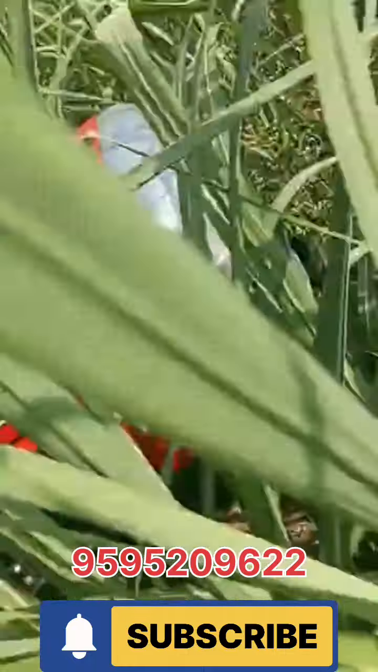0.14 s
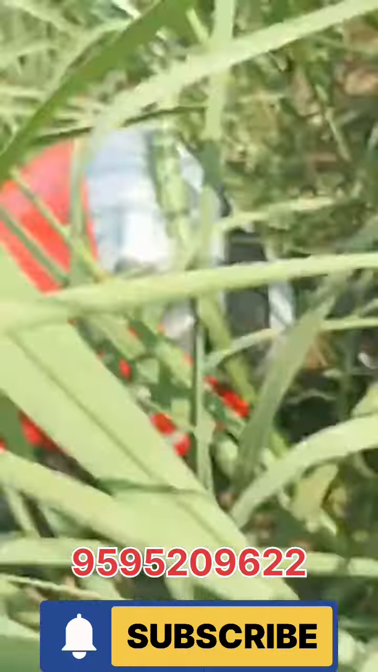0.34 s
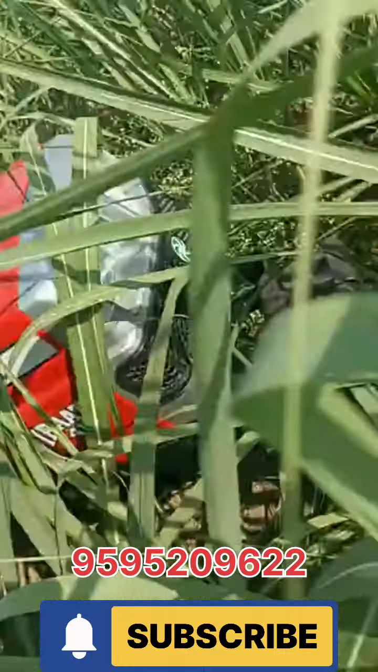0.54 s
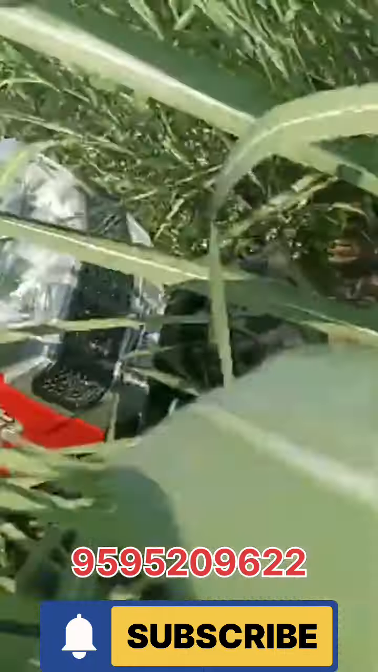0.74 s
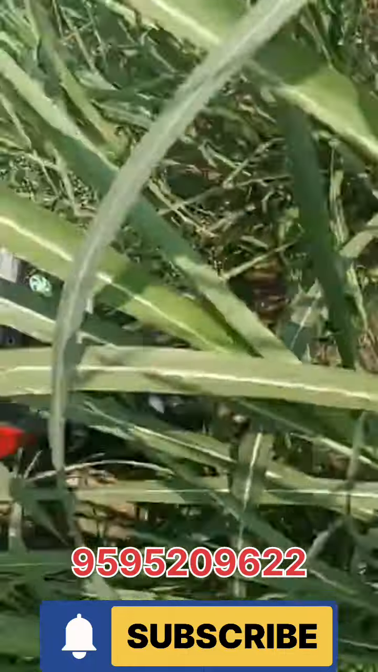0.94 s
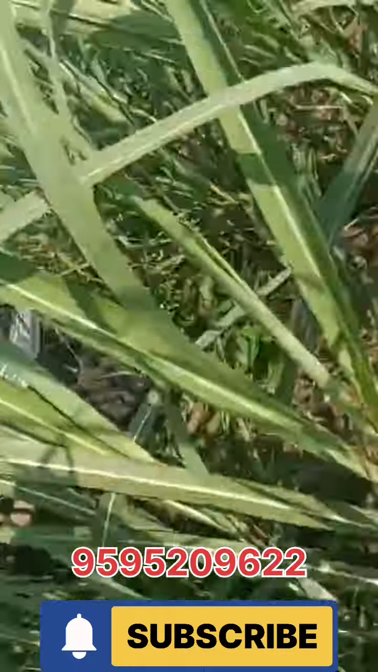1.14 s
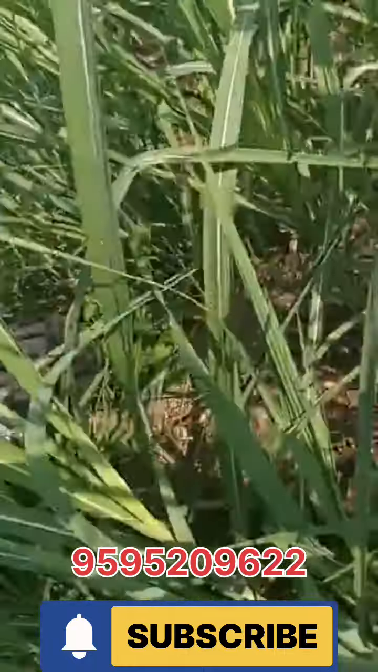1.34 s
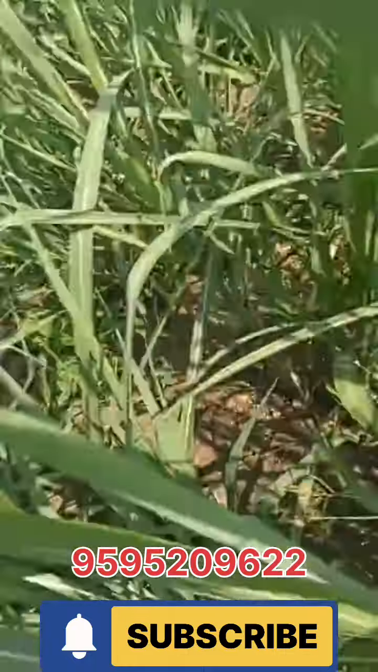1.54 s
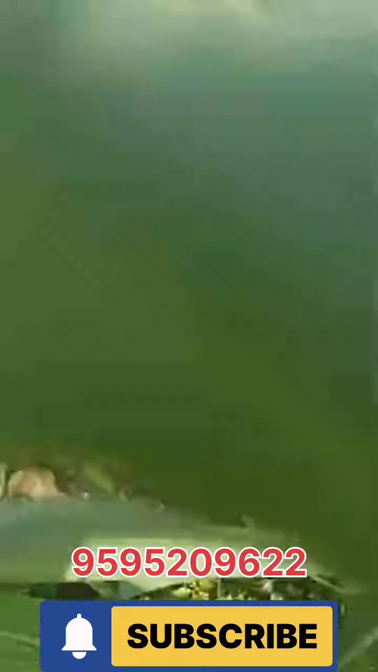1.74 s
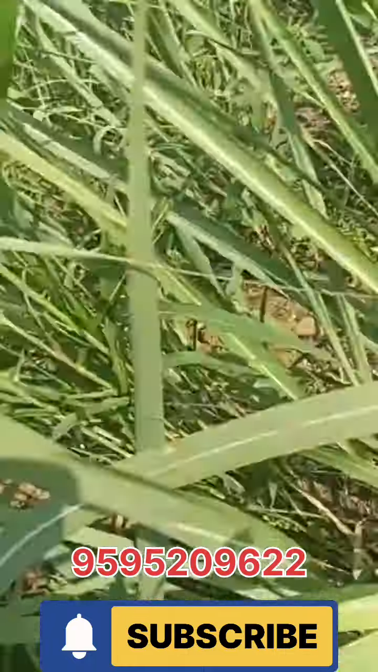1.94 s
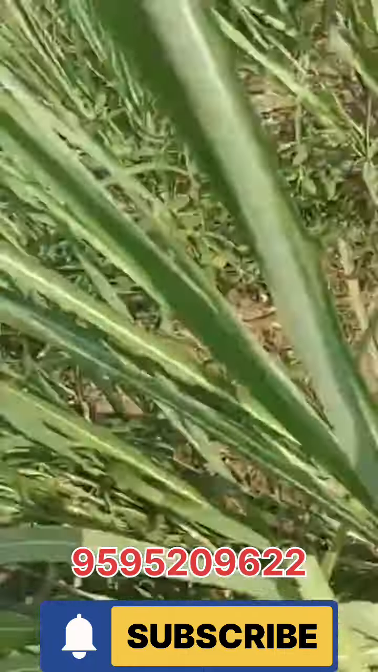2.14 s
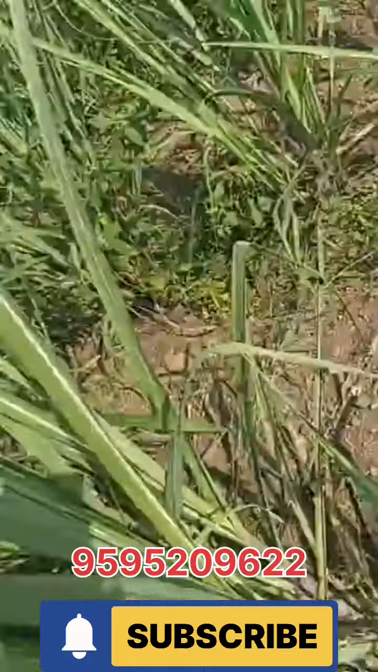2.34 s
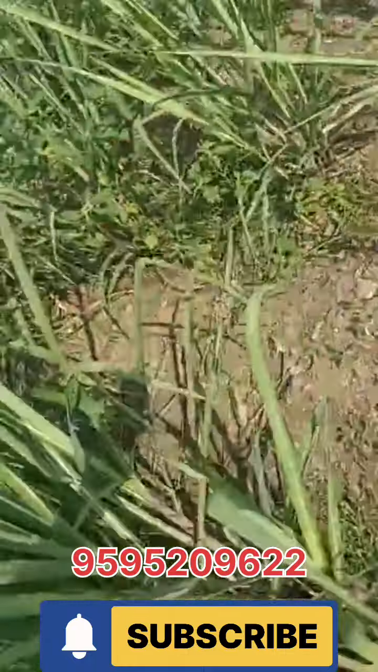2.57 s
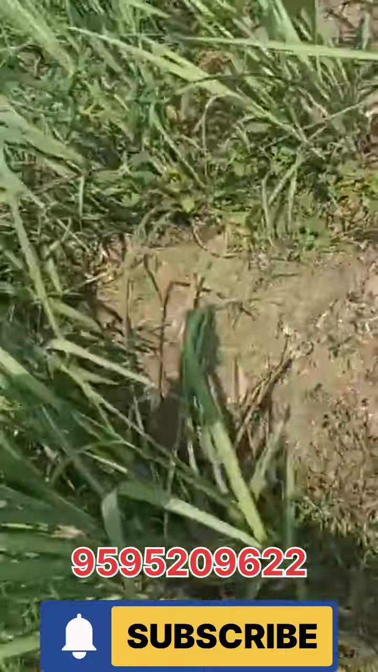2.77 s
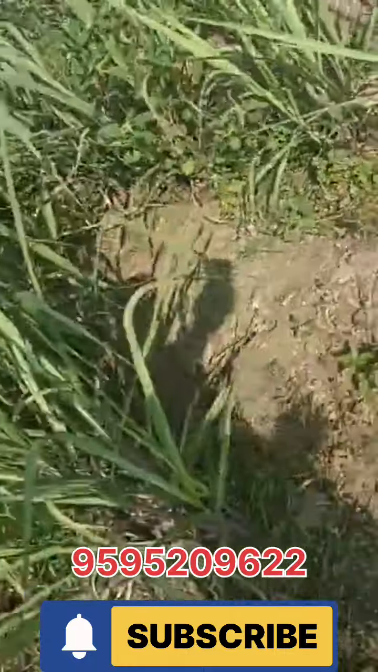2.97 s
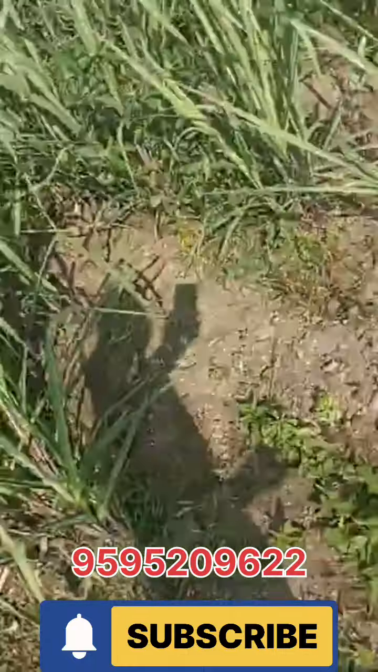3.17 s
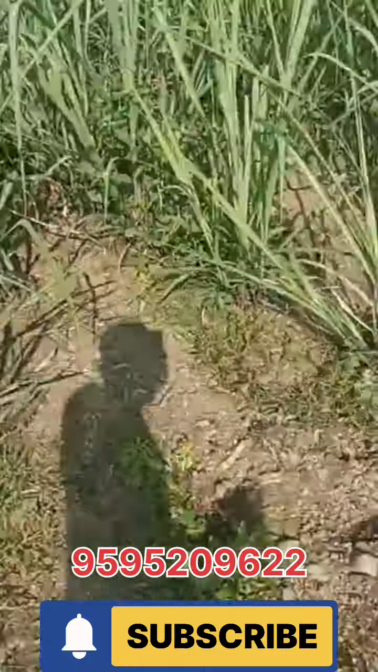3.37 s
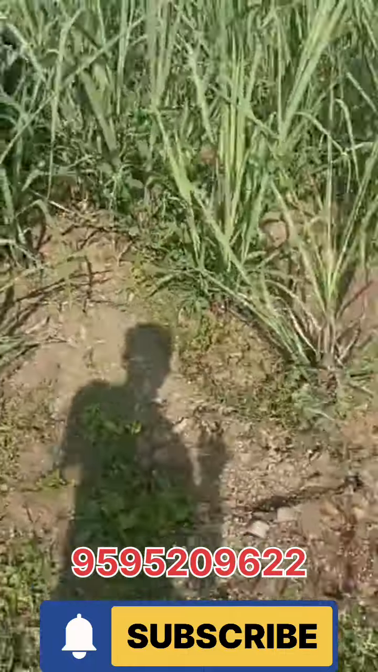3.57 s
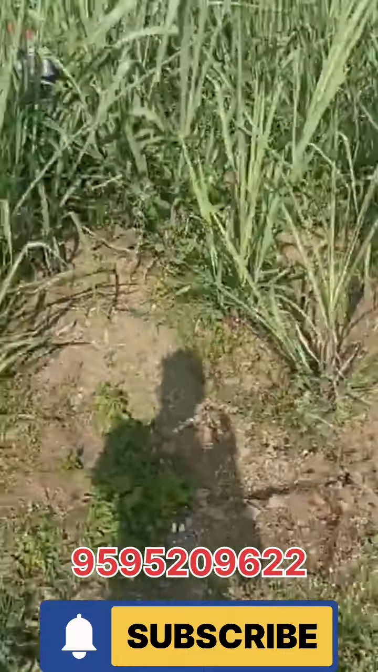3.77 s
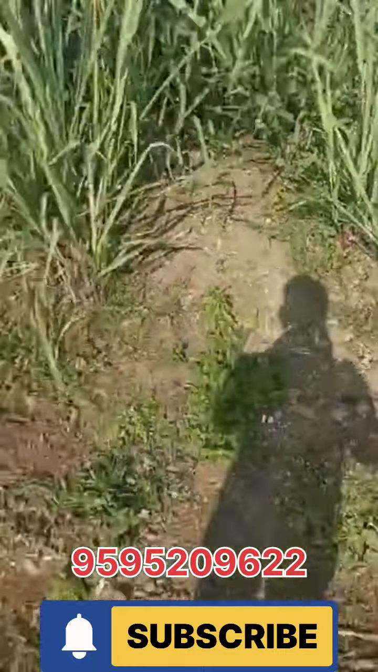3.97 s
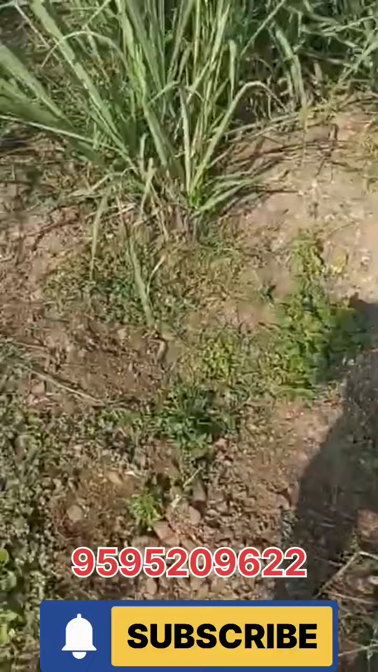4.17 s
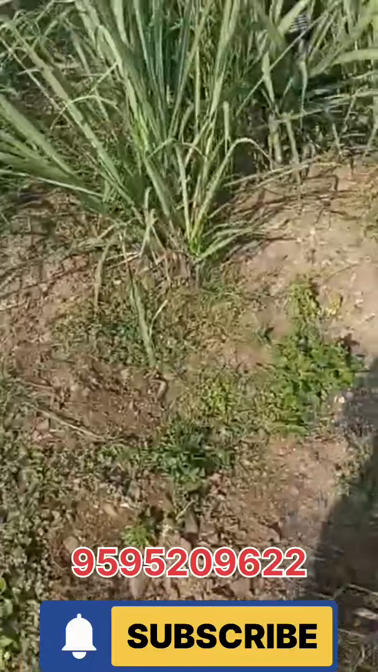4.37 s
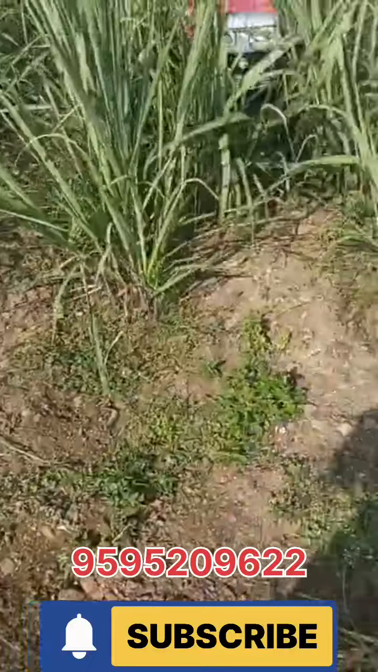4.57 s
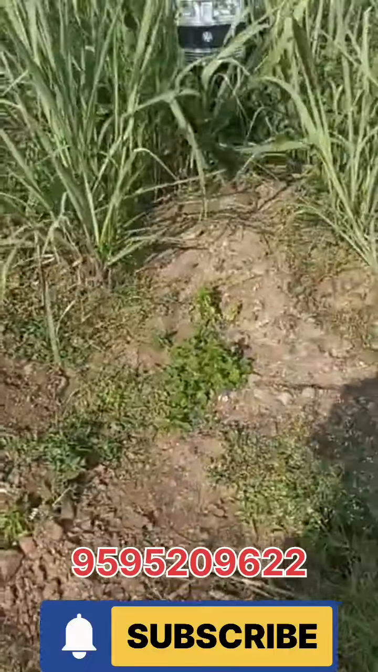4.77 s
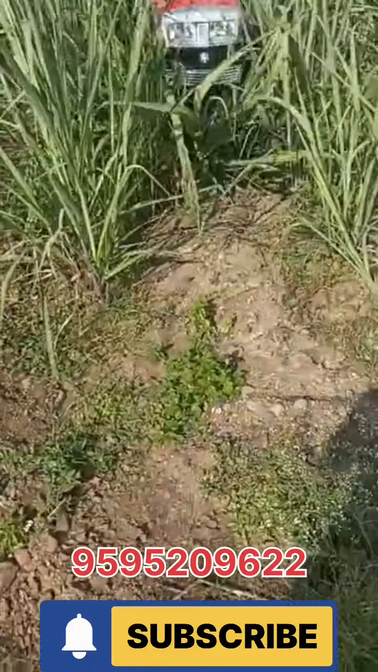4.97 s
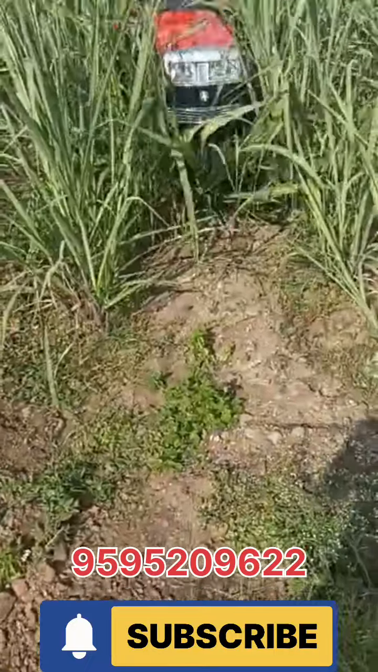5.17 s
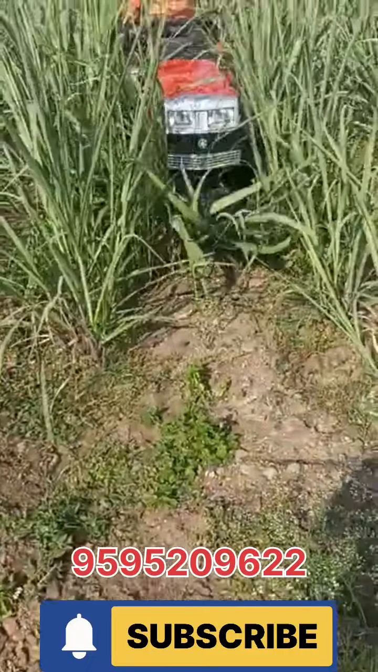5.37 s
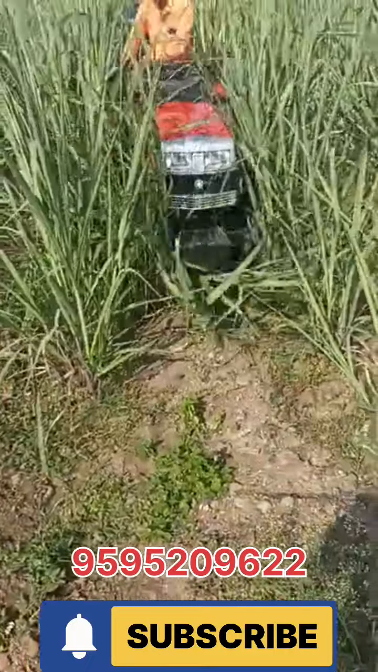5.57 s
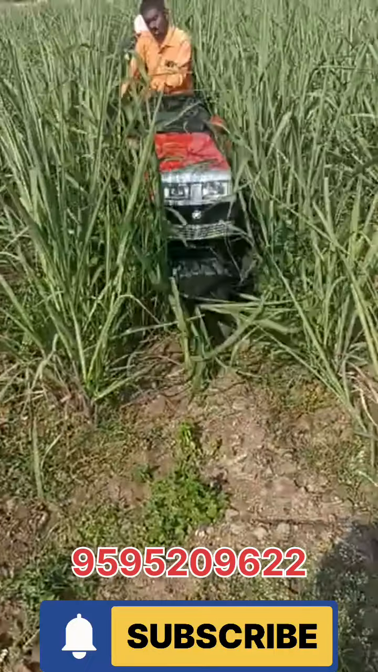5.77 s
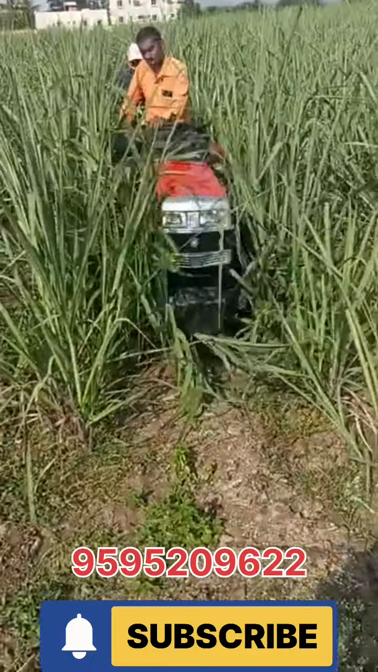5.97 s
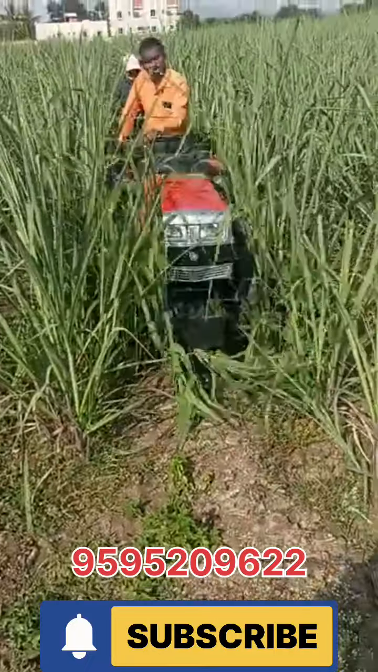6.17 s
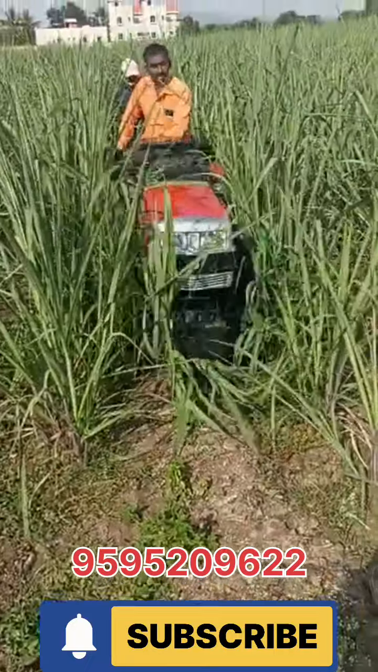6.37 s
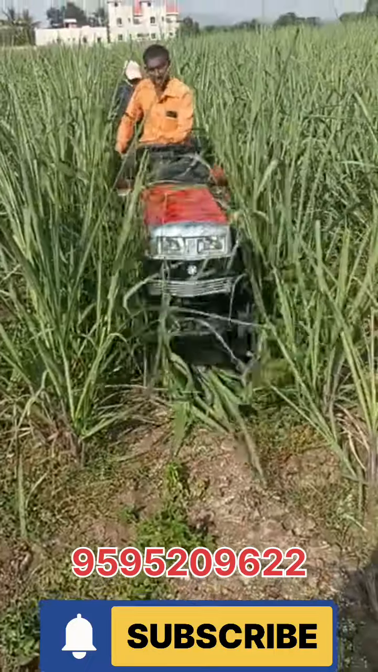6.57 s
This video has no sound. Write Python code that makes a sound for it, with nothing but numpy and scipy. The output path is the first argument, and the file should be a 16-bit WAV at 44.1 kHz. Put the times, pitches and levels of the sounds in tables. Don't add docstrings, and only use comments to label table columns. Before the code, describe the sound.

Outdoors in tall cane, a hand-held stereo phone close to a small diesel tractor dragging a tiller. From 0 to 1.5 s the sound is loudest: a low exhaust hum near 60 firings a second, rough throbbing roar, block knock and gear whine, with leaves rustling, slapping and rubbing left and right, dry stalk snaps and short metallic clanks. It stops hard; about 0.3 s of silence. From 1.8 to 2.5 s the engine returns with a leaf scrape on the left, squeaks and clanks. Silence, then 2.75 to 3.75 s is duller and quieter, mostly engine with sparse ticks. Another gap; from 4.0 to 5.5 s the motor runs slightly faster, clanks clustering at first, one leaf slap and faint scrape near 4.9. After a last gap, 5.8 to 6.7 s holds a clear steady chug, sagging slightly in pitch until it cuts off.

```python
import sys
import numpy as np
from scipy import signal
from scipy.io import wavfile
from scipy.ndimage import uniform_filter1d, minimum_filter1d

SR = 44100
rng = np.random.default_rng(int(sys.argv[2]) if len(sys.argv) > 2 else 0)


def to_wav(sig):
    pcm = np.clip(np.atleast_2d(sig), -1, 1) * 32767
    pcm = np.round(pcm).astype(np.int16)
    wavfile.write(sys.argv[1], SR, pcm.T)


def amplitude_ratio(level_db):
    exponent = np.asarray(level_db, float) / 20
    return 10 ** exponent


N = 291942
T = np.arange(N) / SR
SIZE, HOP = 1024, 256
FRAMES, HZ = np.arange(N // HOP + 5) * HOP / SR, np.fft.rfftfreq(SIZE, 1 / SR)
SIDES = np.array([[.5], [-.5]])

# start_s, end_s
SPLICES = [(0, 1.498), (1.7885, 2.471), (2.751, 3.754), (4.027, 5.4985), (5.799, 6.7)]
# left_lead_ms, alike_below_hz, first_order_db, third_order_db
SHOTS = [(0.091, 720, -1.5, -10), (.03, 1100, -4, -10.5), (0.24, 1100, -4.5, -5), (0.28, 1000, -4, -9),
         (0.21, 1600, -4, -8)]
# roar_db, boom_db (fourth order), hiss_over_rustle_db
GRIPS = [(-22.5, -30, -2.5), (-26, -39.5, -2.5), (-28.5, -47, -3.5), (-27.5, -48.5, -1.5),
         (-27.5, -39, -2.5)]
THROB_CLARITY = [.85, .85, 1.3, 1., 1.4]
TREBLE_LIKENESS = [.35, .3, .1, .55, .45]
# hz, one a shot
LIKENESS_END_HZ = [3100, 3300, 3300, 5000, 4500]
# level_db, one a shot
OPENING_DB = [0, 0, -4, -4, -4]

# time_s, firings_per_s
SPEED = [(0, 59.7), (.64, 59.55), (.86, 58.7), (1.28, 58.95), (1.5, 58.36), (1.79, 58.39), (2.24, 59.63),
         (2.47, 59.48), (2.75, 60.2), (3.2, 59.5), (3.75, 60.26), (4.03, 60.25), (4.45, 61.44),
         (4.9, 61.45), (5.5, 60.9), (5.8, 61.84), (6.2, 60.67), (6.62, 59.2)]
# time_s, exhaust_db, block_in_view_db, cane_on_bonnet_db
STANCE = [(0, -25.5, -21.5, -25), (.43, -26.5, -22.5, -29), (.9, -28.5, -22.5, -27), (1.5, -30.5, -25, -29),
          (1.79, -28.5, -25.5, -27.5), (2.1, -29.5, -30.5, -34.5), (2.47, -30, -31.5, -34),
          (2.75, -26, -30, -38), (3.05, -29.5, -32.5, -38.5), (3.35, -29.5, -32, -36),
          (3.75, -31, -33, -35), (4.03, -30, -31.5, -35.5), (4.35, -30.5, -32.5, -37),
          (4.6, -30.5, -35.5, -39), (5.5, -29, -35.5, -36.5), (5.8, -31.5, -36, -37.5),
          (6.35, -29, -33.5, -35), (6.62, -32, -35, -35.5)]
# time_s, added_left_lead_ms
SWING = [(3.9, 0), (4.0, -.07), (4.3, -.06), (4.6, 0)]

# order, lag_firings, left_minus_right_db, left_lead_rad
EXHAUST_ORDERS = [
    (1, 0, -.4, .05),
    (2, -.04, -1.2, .17),
    (3, -.1, -.5, .08),
    (4, -.05, 1.8, 0),
]
# multiple_of_firing_rate, unsteadiness_rad, level_db in each of the five shots
WHINE_LINES = [(2.28, 0.17, [-43, -41, -48, -43, -47.5]), (2.756, 0.5, [-33.5, -37, -43.5, -46, -38]),
               (4.377, 0.3, [-37, -38.5, -39, -41, -41]), (5, .3, [-39, -52, -54, -52, -44]),
               (5.5, .3, [-39.5, -50, -56, -49, -44.5]), (7.01, 0.55, [-42.5, -47, -45, -57, -61]),
               (8, 0.38, [-40, -41, -43.5, -61, -59]), (8.793, 0.26, [-36, -35.5, -38.5, -41, -44]),
               (9.04, 0.66, [-46, -40.5, -47, -49, -53.5]), (10.02, 0.4, [-44.5, -43, -49, -52, -54]),
               (10.46, 0.3, [-39, -36, -53, -55, -54]), (11.02, 0.5, [-41, -45, -43.5, -44.5, -42.5]),
               (12.2, 0.45, [-37.5, -44, -42, -48, -45]), (21.14, 0.36, [-40.5, -40.5, -48, -40, -39])]

# freq_hz, left_db, right_db
ROAR_CLOSE = [(35, -14.5, -24.5), (87.8, -2.5, -5.5), (158.6, -13.5, -9), (200, 3, 1), (238, 0, -3.5),
              (272, -1, -1.5), (340, -2, -0.5), (434, 1.5, 0.5), (553, -6.5, -2), (700, 1, -2.5),
              (830, -8.5, 0.5), (1030, 1, -11.5), (1290, -9.5, -1), (1550, -4, -23), (1767, -4.5, -1),
              (2214, -4, -7)]
ROAR_LEAVING = [(34.5, -21, -30), (92.3, -6, -5), (150, -8, -7.5), (210, -9.5, -15.5), (340, -8, -6),
                (435, -3, -4), (530, -8, -4), (680, -4.5, -4.5), (848, -14, -5), (1008, -5.5, -6),
                (1294, -9.5, -11.5), (1600, -10.5, -12), (1870, -13, -7), (2200, -15.5, -19)]
ROAR_TURNED = [(35, -19, -15), (90, -9.5, -8), (150, -1, -1.5), (209, -1, -4), (340, -7, -6.5),
               (416.5, -3.5, -3.5), (526, -6.5, -9), (699, -1, -0.5), (830, -11, -5), (1080, 1.5, -4.5),
               (1220, -8, -3.5), (1600, -8, -16.5), (1900, -13, -6.5), (2172, -6.5, -7.5)]
ROAR_FACING = [(35, -19, -18.5), (90, -9, -5.5), (150, -8.5, -11.5), (210, -4, -6.5), (340, -8.5, -2),
               (475, -16, -4.5), (570, 2, -25), (714, -5.5, -4), (910, -11.5, -11.5), (1160, -0.5, -1.5),
               (1340, -12, -0.5), (1553, -24, -7), (1800, -5.5, -3), (1975, -7, -14.5)]
ROAR_NEARING = [(35, -15.5, -12.5), (89, -7, -8.5), (149.8, -2, -1), (209, -6.5, -5.5), (340, -0.5, 0),
                (444, -16, 4.5), (557, -2, -21.5), (715, 1.5, 0), (854, -8, -9), (1080, -2, -2),
                (1328, -5.5, 1.5), (1500, -11.5, 1.5), (1670, -7, -14.5), (2030, -5.5, -1.5)]
# freq_hz, left_db, right_db
KNOCK_CLOSE = [(1940, -5, -2), (2210, 1.5, 0.5), (2430, -2.5, -0.5), (2770, -9.5, 4), (2920, 1, -2.5),
               (3200, -3.5, 0.5), (3700, -17, -1)]
KNOCK_TURNED = [(2000, -1, -7.5), (2199, 1.5, 0), (2470, -2, 2.5), (2800, -1.5, 0), (3013, -2, -9.5),
                (3340, -1.5, -5.5), (3580, -12, -5)]
KNOCK_FACING = [(2010, 4, -21), (2190, 3, 5), (2440, 4, -4), (2850, -4.5, 2.2), (3010, 2.5, -6),
                (3483, -2.5, 1), (3693, -8, -4.5)]
# freq_hz, left_db, right_db
TOP_CLOSE = [(3800, -1, -7.5), (4200, -6.5, 0.5), (4644, -7.5, -2), (6000, -6, -3), (6700, -14, 0),
             (6900, -11, -4), (7980, -16, -5.5), (8700, -11, -12), (9900, -9.5, -14), (11800, -6, -13.5),
             (11760, -1, -17), (12450, -3.5, -13.5), (13000, -9, -10.5), (15700, -9, -18)]
TOP_TURNED = [(3700, -2.5, 3), (4400, -1, -1.5), (4936, -3, -3), (6000, -4.5, -0.3), (6750, 1, -3.5),
              (7050, -11.5, -2), (7800, -6.5, -4.5), (8600, -10.5, -10), (9730, -10, -9.5),
              (11370, -5.5, -15.5), (11890, -2.5, -7), (13060, -6, -12), (15700, -10, -13.5)]
TOP_FACING = [(3700, 2.5, -6), (4360, -3, 1), (4900, -3.5, -4), (6000, -0.5, -1), (6780, -10, 3.5),
              (6660, -10.5, -2), (7850, -5, -9), (8700, -12.5, -6), (10000, -6, -18), (11350, -4, -20),
              (11850, 0, -15.5), (13000, -3.5, -13.5), (15700, -9, -19)]
ROARS = [ROAR_CLOSE, ROAR_LEAVING, ROAR_TURNED, ROAR_FACING, ROAR_NEARING]
KNOCKS = [KNOCK_CLOSE, KNOCK_CLOSE, KNOCK_TURNED, KNOCK_FACING, KNOCK_FACING]
TOPS = [TOP_CLOSE, TOP_CLOSE, TOP_TURNED, TOP_FACING, TOP_FACING]

# time_s, centre_hz, depth_db
GROUND_NOTCH = [(3.9, 340, -0.5), (4.03, 384, -3), (4.2, 380.4, -15), (4.5, 461, -13), (5.5, 501, -15),
                (6.1, 482, -12), (6.62, 479, -1.5)]
# time_s, centre_hz, depth_db
HAND_SHADOW = [(3.05, 1500, 1), (3.5, 1194, -10), (3.76, 1223, -0.5), (4.03, 1302, -11), (4.2, 1280, -8.5),
               (4.4, 1448, 1), (6.0, 1700, -2), (6.2, 1690, -3.5), (6.4, 1700, -2.5), (6.62, 1680, -6)]
# time_s, centre_hz, height_db
LOW_PANEL = [(0, 2440, 0), (.3, 2433, 1), (.42, 2420, 0), (.55, 2470, 10), (1., 2460, 5.5),
             (1.15, 2460, 0.5), (1.79, 2470, 5.5), (2.47, 2470, 3), (2.75, 2470, 3), (3.75, 2490, 4),
             (4.03, 2440, 4), (4.45, 2470, 5), (4.6, 2387, 3.5), (6.62, 2380, 0)]
HIGH_PANEL = [(0, 2770, 3), (.35, 2770, 6), (.6, 2640, 2), (.85, 2790, 7), (1.05, 2790, 0.5),
              (2.0, 2790, -6.5), (2.2, 2850, 9), (2.47, 2850, 4), (2.75, 2740, 4), (3.75, 2740, 5.5),
              (4.03, 2800, 6.5), (4.3, 2800, 4.5), (4.55, 2800, -1.5), (4.7, 2800, -5.5), (6.62, 2760, 7)]
# time_s, centre_hz, height_db
BONNET_DRONE = [(0, 270, 7), (.5, 270, 0), (1., 260, 0.5), (1.3, 270, -1.5), (1.5, 270, -12),
                (1.6, 270, -7.5), (1.7, 271, -2.5)]
# freq_hz, level_db
FAINT_LIMIT = [(1200, -70), (1700, -59.5), (2600, -63), (3800, -66.5), (5000, -65.8), (6000, -69),
               (7800, -70), (9000, -72), (10500, -78)]

# middle_s, half_length_s, rustle_rise_db, hiss_rise_db
SWIPES = [(0.064, 0.091, -2, 2), (0.288, 0.067, 5, 4.5), (0.455, 0.16, 7.5, 7), (0.67, 0.15, 1.5, 1.5),
          (1.048, 0.13, 2.5, -1), (1.248, 0.1, 6, 5.5), (1.36, 0.1, 2, 6.5), (1.864, 0.036, 6, 4.5),
          (2.015, 0.055, 4.5, 3), (2.103, 0.037, 2, 3), (4.85, 0.18, 1, 1.5)]
# start_s, peak_db, left_minus_right_db, length_ms, centre_hz
SLAPS = [(.2505, -26.5, 5, 5.8, 9000), (.3995, -27.5, 2.5, 8, 6500), (.547, -24, -3, 2, 4000),
         (.8005, -32.5, -7, 5, 5000), (.868, -22, -10.5, 14.4, 5500), (.987, -32, -8.5, 6, 5500),
         (1.047, -31, -5.5, 7, 5500), (1.207, -23.5, 7, 8, 6000), (2.0445, -27, 10, 1.9, 6000),
         (2.835, -29, 0, 4.5, 6000), (4.8975, -24, 7, 4.3, 3200)]
# start_s, peak_db, left_minus_right_db, length_ms, centre_hz
SCRAPES = [
    (1.7926, -19.5, 15, 20, 2300),
    (1.892, -22, 0, 5, 2000),
    (4.885, -30, 8, 12, 2000),
    (1.901, -20.5, 12, 2.4, 12700),
]
# start_s, peak_db, left_minus_right_db, length_ms, centre_hz
RUBS = [(.034, -18, -7, 8, 6500), (.325, -28, 11, 10, 12000), (.398, -19.5, -8.5, 8, 6300),
        (.415, -17, 11, 20, 11700), (.462, -17.5, -10.5, 23, 6500), (.478, -26.5, 10, 10, 12500),
        (.497, -15.5, -14.5, 10, 6700), (.508, -19.5, -14.5, 19, 7700), (.568, -22, -10, 12, 7800),
        (1.198, -24, 11, 24, 11800), (1.224, -27, -2, 12, 4000), (1.264, -23.5, -10, 49, 6600),
        (1.312, -23, 18, 22, 12200), (1.382, -18.5, 17, 22, 12600), (1.475, -17.5, 16, 4.2, 11800),
        (1.794, -23, 10.5, 11, 11500), (1.824, -37, -2.5, 16, 6400), (1.862, -33, -7.5, 14, 7000),
        (1.884, -20, 11, 14, 12000), (1.957, -21.5, -15, 6, 6700), (1.972, -23, -16, 16, 6100),
        (1.98, -29.5, 10, 10, 11200), (2.105, -23, -8, 6, 7200)]
# start_s, peak_db, left_minus_right_db, length_ms, centre_hz
TICKS = [(.0962, -13, 0, .5, 3000), (.1108, -10, 0, .7, 2800), (.2538, -15, 3, .6, 7000),
         (.329, -16, 0, .8, 3000), (.4165, -12, 0, .5, 6500), (.4638, -13, -4, 1, 5000),
         (1.2265, -13, 0, .6, 5000), (1.2775, -16, -4, .8, 6000), (1.8253, -18, -1, 1, 5000),
         (1.9025, -19, 6, 1.5, 11500)]
# start_s, peak_db, left_minus_right_db, ring_ms, pitch_hz
CLANKS = [(.24, -12, -1, 4, 2560), (.395, -13, -2, 3, 2680), (0.548, -11, 0, 2.5, 2520),
          (0.596, -21, -2.5, 4, 2510), (.897, -16, -6, 5, 2580), (.9353, -15, -6, 6, 2500),
          (1.0355, -15, -5, 4, 2200), (1.2064, -19.5, -1, 4, 2400), (1.232, -14.5, 0, 5, 4030),
          (1.9605, -23, -4, 3.4, 2320), (2.152, -22, -2, 3.9, 2900), (2.181, -22, -2, 5, 2920),
          (2.2947, -20.5, -3, 4, 2400), (2.314, -20.5, -2, 5, 2800), (2.451, -23, -2, 5, 2920),
          (2.463, -19, 2, 4.5, 2070), (2.8312, -24, -2.5, 4, 2470), (2.896, -28, -4.5, 4, 2620),
          (3.23, -26, 4, 3.4, 2520), (3.503, -22, -4.5, 4.4, 2500), (3.701, -27, -6, 4, 2540),
          (4.041, -22, -9, 5, 2500), (4.079, -25, 0, 4, 1950), (4.099, -22, -3, 2, 3000),
          (4.116, -24, 0, 4, 1950), (4.117, -24, -3, 3, 3020), (4.1655, -27, 0, 3, 1850),
          (4.28, -29, -7, 6.7, 2850), (5.341, -29, 4.5, 4.4, 2700)]

KNOCK_HZ, RUSTLE_HZ, HISS_HZ = 2000, 3620, 8600
SNAP_OCTAVES, SCRAPE_OCTAVES, RUB_OCTAVES = 1.6, .87, .32
SNAP_RISE, RUB_RISE = .041, .25


def column(points, k, t=T):
    rows = np.array(points)
    return np.interp(t, rows[:, 0], rows[:, k])


def shot_at(t):
    return np.searchsorted([start - .1 for start, _ in SPLICES[1:]], t)


def evened(x):
    return x / np.sqrt(np.mean(x ** 2) + 1e-20)


def drift(shape, wide, long):
    across_hz = uniform_filter1d(rng.standard_normal(shape), wide, axis=0)
    return evened(uniform_filter1d(across_hz, long, axis=-1))


def wander(count, step):
    knots = rng.standard_normal((N // step + 4, count)).T
    return evened(np.array([np.interp(np.arange(N) / step, np.arange(len(k)), k) for k in knots]))


def dip(points, width_hz):
    centre_hz = column(points, 1, FRAMES)
    return column(points, 2, FRAMES) * np.exp(-((HZ[:, None] - centre_hz) / width_hz) ** 2)


def port_likeness():
    shot, hz = shot_at(FRAMES), HZ[:, None]
    alike_hz = np.array(SHOTS)[shot, 1]
    same = 1 / (1 + (hz / alike_hz) ** 2.8)
    left_over, end_hz = np.array([TREBLE_LIKENESS, LIKENESS_END_HZ])[:, shot]
    same = same + (1 - same) * left_over / (1 + (hz / end_hz) ** 8)
    breeze = (HZ > 60) & (HZ < 170)
    return same * np.where(breeze, .59, 1)[:, None]


def port_noise():
    same = port_likeness()
    lead_ms = np.array(SHOTS)[shot_at(FRAMES), 0] + column(SWING, 1, FRAMES)
    a, b, c, d = rng.standard_normal((len(FRAMES), len(HZ), 4)).T
    shared, own = a + 1j * b, c + 1j * d
    late = np.exp(-2j * np.pi * HZ[:, None] * lead_ms / 1000)
    ports = np.array([shared, late * same * shared + np.sqrt(1 - same ** 2) * own])
    shape_db = dip(GROUND_NOTCH, width_hz=52) + dip(HAND_SHADOW, width_hz=220)
    shape_db = shape_db + dip(LOW_PANEL, width_hz=66) + dip(HIGH_PANEL, width_hz=45)
    shape_db = shape_db + dip(BONNET_DRONE, width_hz=58)
    patchy_db = np.interp(HZ, (300, 1500, 2500, 5000, 9000, 12000), (.8, .9, 1.6, 1.8, 1.1, 1.5))[:, None]
    patches = np.array([drift(a.shape, 12, 6) for _ in ports])
    return ports * amplitude_ratio(shape_db + patchy_db * patches)


def layer(noise, spectra, lo_hz, hi_hz):
    inside, shapes = (HZ >= lo_hz) & (HZ < hi_hz), []
    for f, *ports in map(np.transpose, spectra):
        level_db = np.array([np.interp(np.log(HZ + 1), np.log(f), p) for p in ports])
        gain = amplitude_ratio(level_db) * inside
        shapes.append(gain / np.linalg.norm(gain))
    coloured = noise * np.array(shapes)[shot_at(FRAMES)].transpose(1, 2, 0)
    return evened(signal.istft(coloured, nperseg=SIZE, noverlap=SIZE - HOP)[1][:, :N])


def levels():
    roar_db, boom_db, bright_db = np.array(GRIPS)[shot_at(T)].T
    nearer_db = column(STANCE, 1) + 29
    cane_db, swipe_db = column(STANCE, 3), np.zeros((2, N))
    for s, half, *rise_db in SWIPES:
        swell = np.cos(np.pi / 2 * np.clip((T - s) / half, -1, 1)) ** 2
        swipe_db += np.outer(rise_db, swell)
    return (boom_db + 2.3 * nearer_db, roar_db + .47 * nearer_db, column(STANCE, 2),
            cane_db + swipe_db[0], cane_db + bright_db + swipe_db[1])


def throb(turns, luck, depth, lag, uneven_db, cylinder_db):
    strength_db = uneven_db * luck[(turns - lag).astype(int)]
    cycle_db = cylinder_db * np.cos(2 * np.pi * (turns - .5) / 4)
    place = (turns - lag) % 1 / .095
    burst = place * np.exp(1 - place) * np.array(THROB_CLARITY)[shot_at(T)]
    return evened((1 + depth * burst * amplitude_ratio(strength_db)) * amplitude_ratio(cycle_db))


def brushing_cane(noise, turns, luck, rustle_db, hiss_db):
    rustle = amplitude_ratio(rustle_db + 1.0) * layer(noise, TOPS, RUSTLE_HZ, HISS_HZ)
    hiss = amplitude_ratio(hiss_db + 2.0) * layer(noise, TOPS, HISS_HZ, SR / 2)
    rustle_throb = throb(turns, luck, depth=.22, lag=.6, uneven_db=3., cylinder_db=.6)
    hiss_throb = throb(turns, luck, depth=.36, lag=.58, uneven_db=2.5, cylinder_db=.6)
    crackle_db = 1.0 * wander(count=2, step=220) + 1.2 * wander(count=2, step=1600)
    return amplitude_ratio(crackle_db) * (rustle * rustle_throb + hiss * hiss_throb)


def snaps(leaves, octaves, rise):
    out, age_ms = np.zeros((2, N)), np.arange(6000) / SR * 1000
    noises = rng.standard_normal((len(leaves), 2, 6000))
    for (s, peak_db, pan_db, ms, hz), noise in zip(leaves, noises):
        edges = np.minimum(hz * 2 ** (np.array([-.5, .5]) * octaves), (15000, 20000))
        band = signal.butter(2, edges, "band", fs=SR, output="sos")
        puff = evened(signal.sosfilt(band, noise))
        shape = (1 - np.exp(-age_ms / (rise * ms))) * np.exp(-age_ms / ms)
        at = round(s * SR)
        out[:, at:at + 6000] += amplitude_ratio(peak_db + pan_db * SIDES) * shape * puff
    return out


def leaves_on_phone():
    touches = snaps(SLAPS, SNAP_OCTAVES, SNAP_RISE) + snaps(SCRAPES, SCRAPE_OCTAVES, SNAP_RISE)
    touches = touches + snaps(RUBS, RUB_OCTAVES, RUB_RISE)
    return touches + snaps(TICKS, SNAP_OCTAVES, SNAP_RISE)


def clanks():
    out, age_ms = np.zeros((2, N)), np.arange(2000) / SR * 1000
    for s, peak_db, pan_db, ms, hz in CLANKS:
        phase = 2 * np.pi * hz * age_ms / 1000
        pair = np.sin(phase) + .5 * np.sin(1.06 * phase)
        ring = pair * (1 - np.exp(-age_ms / .5)) * np.exp(-age_ms / ms)
        at = round(s * SR)
        out[:, at:at + 2000] += amplitude_ratio(peak_db + pan_db * SIDES) * ring
    return out


def whine(turns):
    out, shot, rate = np.zeros((2, N)), shot_at(T), np.gradient(turns) * SR
    lag_turns = np.array(SHOTS)[shot, 0] / 1000 * rate * [[0], [1]]
    for multiple, unsteady, levels_db in WHINE_LINES:
        hz = multiple * rate.mean()
        tilts = [np.interp(hz, f, left - right) / 2 for f, left, right in map(np.transpose, ROARS)]
        tilt_db = np.array(tilts)[shot] * [[1], [-1]]
        wobble = wander(count=3, step=2500)
        line = np.cos(2 * np.pi * multiple * (turns - lag_turns) + unsteady * wobble[0])
        level_db = np.array(levels_db)[shot] + tilt_db + 1.6 * wobble[1:]
        out += np.sqrt(2) * amplitude_ratio(level_db) * line
    return out


def engine_noise(noise, turns, luck, roar_db, knock_db):
    roar = amplitude_ratio(roar_db + 1.5) * layer(noise, ROARS, 0, KNOCK_HZ)
    uneven_knock_db = knock_db + 1.5 + .5 * wander(count=1, step=2200)
    knock = amplitude_ratio(uneven_knock_db) * layer(noise, KNOCKS, KNOCK_HZ, RUSTLE_HZ)
    low = signal.oaconvolve(roar, signal.firwin(255, 1000, fs=SR)[None], "same")
    low_throb = throb(turns, luck, depth=.4, lag=.54, uneven_db=1., cylinder_db=.4)
    chug_throb = throb(turns, luck, depth=.8, lag=.55, uneven_db=1.1, cylinder_db=.4)
    knock_throb = throb(turns, luck, depth=.55, lag=.61, uneven_db=1.5, cylinder_db=.7)
    return low * low_throb + (roar - low) * chug_throb + knock * knock_throb


def exhaust(turns, boom_db):
    main_db, out = column(STANCE, 1), np.zeros((2, N))
    first_db, third_db = np.array(SHOTS)[shot_at(T), 2:].T
    levels_db = [main_db + first_db, main_db - .3, main_db + third_db, boom_db]
    for (order, lag, pan_db, lead), level_db in zip(EXHAUST_ORDERS, levels_db):
        gain = amplitude_ratio(level_db + pan_db * SIDES + .7 * wander(count=1, step=2500))
        out += gain * np.cos(2 * np.pi * order * (turns - lag) + lead * SIDES)
    return np.sqrt(2) * out


def engine_turns():
    turns = np.cumsum(column(SPEED, 1)) / SR
    slip = .16 * np.exp(-np.maximum(T - 2.751, 0) / .025)
    return turns + slip * (shot_at(T) == 2)


def scene():
    turns, noise = engine_turns(), port_noise()
    boom_db, roar_db, knock_db, rustle_db, hiss_db = levels()
    luck = np.clip(rng.standard_normal(1000), -1.3, .8)
    cane = brushing_cane(noise, turns, luck, rustle_db, hiss_db) + leaves_on_phone()
    machine = clanks() + whine(turns) + engine_noise(noise, turns, luck, roar_db, knock_db)
    return cane + machine + exhaust(turns, boom_db)


def lose_faint_bands(x):
    mid_side = np.array([x[0] + x[1], x[0] - x[1]]) / 2
    z = signal.stft(mid_side, nperseg=SIZE, noverlap=SIZE - HOP)[2]
    power = (abs(z[:, :-1]) ** 2).reshape(2, -1, 4, z.shape[-1]).mean(axis=2)
    bands = uniform_filter1d(power, size=5, axis=-1)
    limit = amplitude_ratio(2 * np.interp(HZ[2::4], *np.transpose(FAINT_LIMIT)))[:, None]
    kept = minimum_filter1d(np.repeat(bands > limit, 4, axis=1) * 1., size=5, axis=-1)
    kept = np.pad(kept, ((0, 0), (0, 1), (0, 0)))
    mid, side = signal.istft(z * kept, nperseg=SIZE, noverlap=SIZE - HOP)[1][:, :N]
    return np.array([mid + side, mid - side])


def low_pass(x):
    return signal.sosfilt(signal.butter(12, 16790, fs=SR, output="sos"), x)


def record(dry):
    top_edge = signal.firwin(1023, 15760, window=("kaiser", 10), fs=SR)[None]
    limited = signal.oaconvolve(lose_faint_bands(dry), top_edge, "same")
    thin = signal.lfilter(*signal.butter(1, (350, 9000), "band", fs=SR), limited)
    treble = signal.lfilter(*signal.butter(1, 400, "high", fs=SR), limited)
    gate, smear, veil = np.zeros((3, N))
    for (start, end), open_db in zip(SPLICES, OPENING_DB):
        after = np.maximum(T - end, 0)
        gate += np.clip((T - start) / .0008, 0, 1) * np.clip((end - T) / .0015 + .5, 0, 1)
        smear_db = -14 - 250 * after - 60 * (after / .026) ** 8
        smear += amplitude_ratio(smear_db) * np.clip((T - end) / .0015 + .5, 0, 1) * (after < .05)
        veil += 1 - amplitude_ratio(open_db * np.exp(-((T - start) / .007) ** 2))
    mix = (limited - veil * treble) * gate + thin * smear
    return low_pass(mix)


dry = scene()
out = record(dry)
to_wav(out)
```